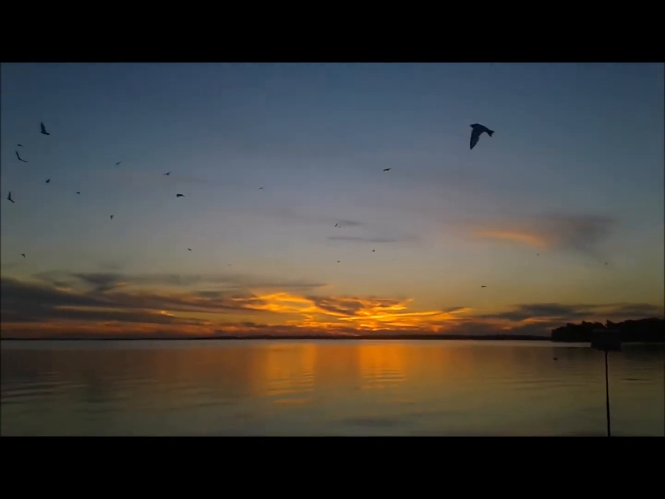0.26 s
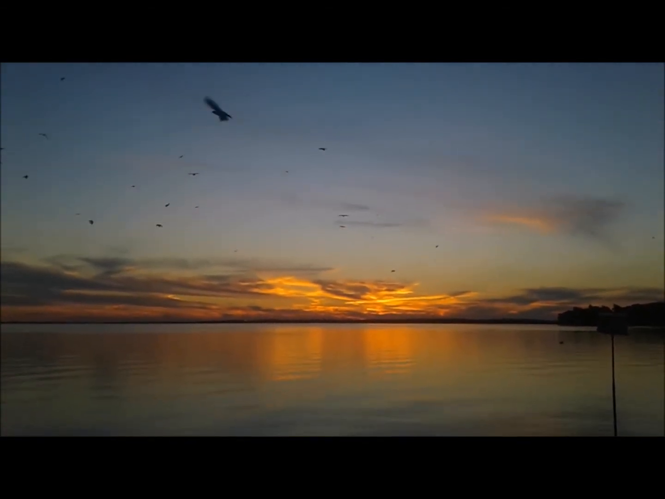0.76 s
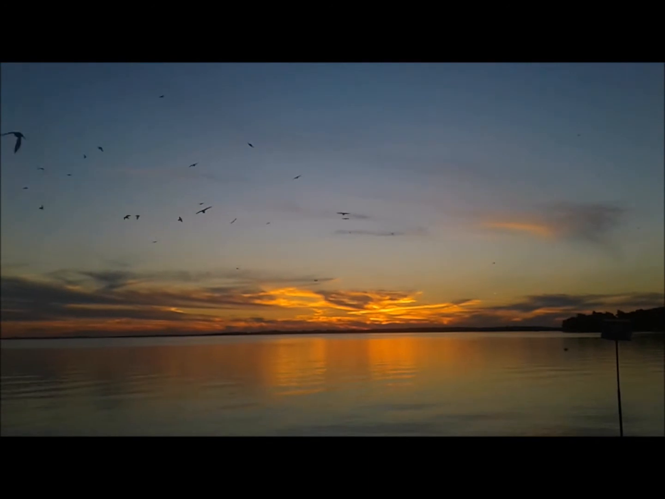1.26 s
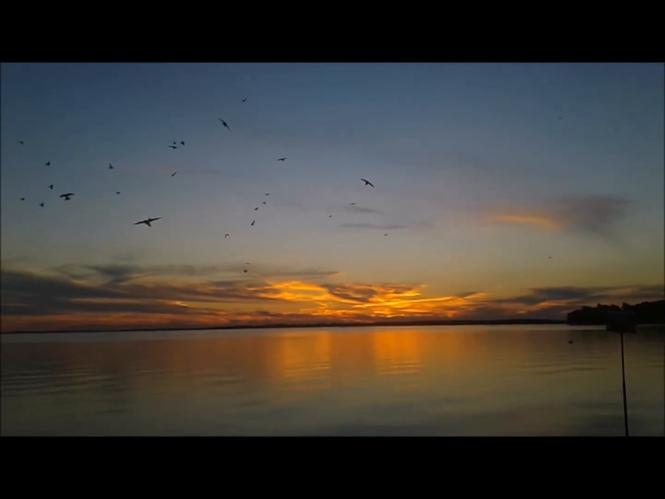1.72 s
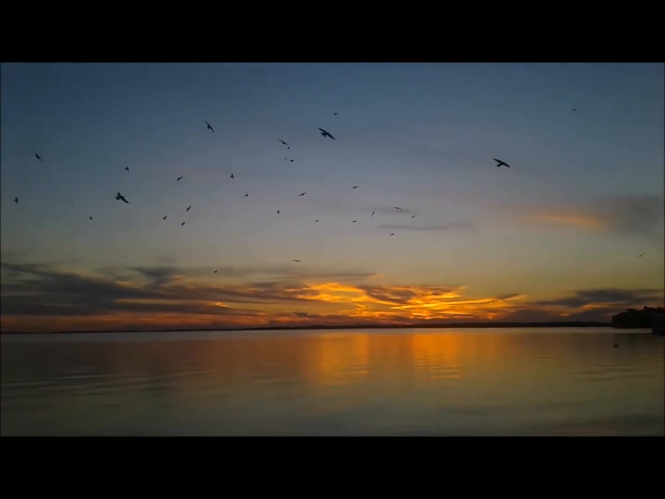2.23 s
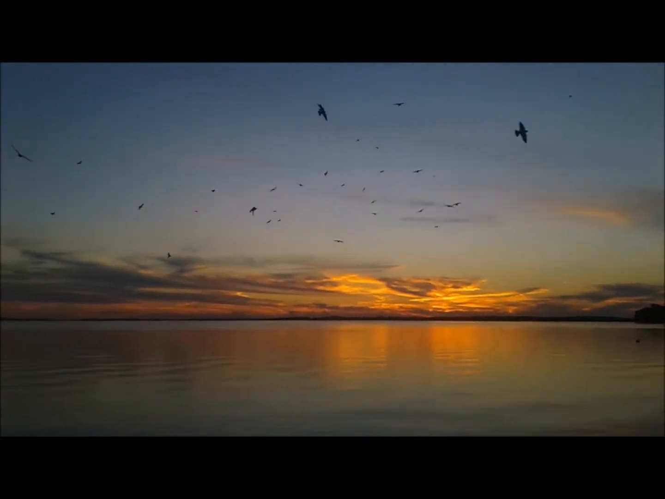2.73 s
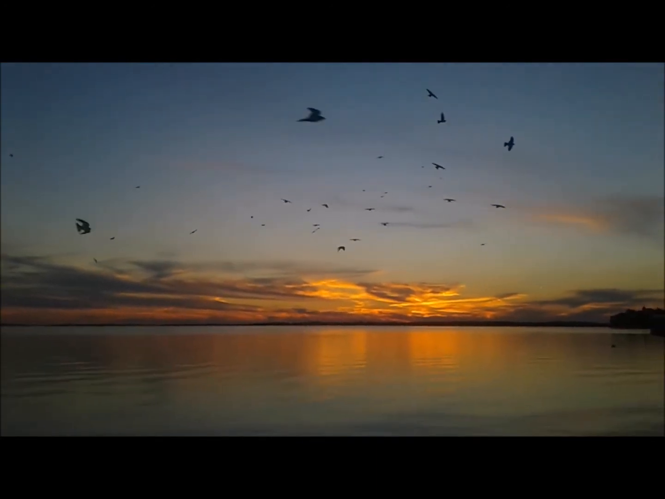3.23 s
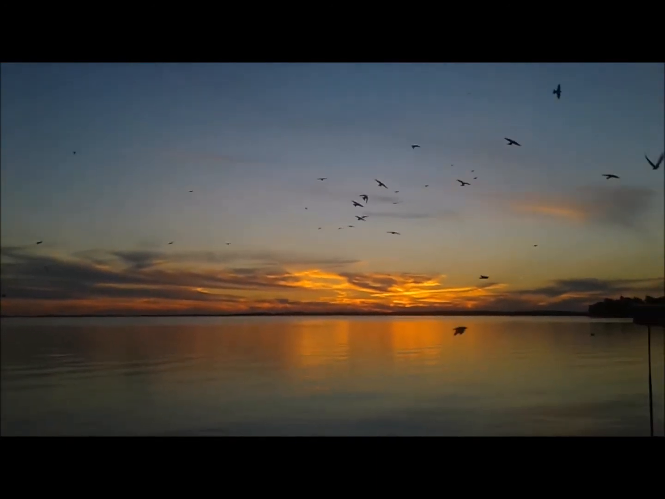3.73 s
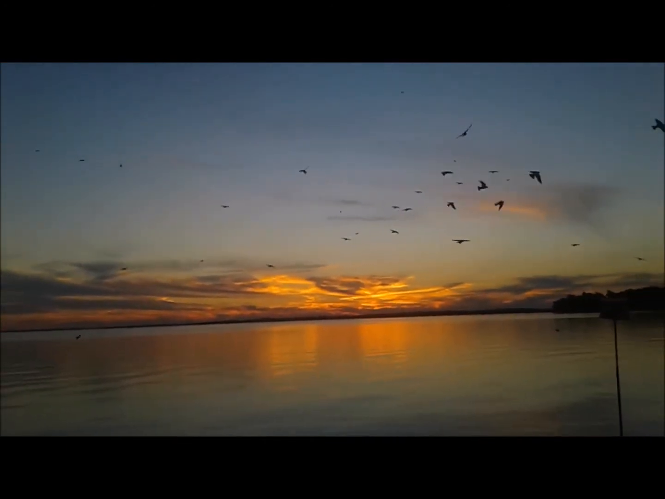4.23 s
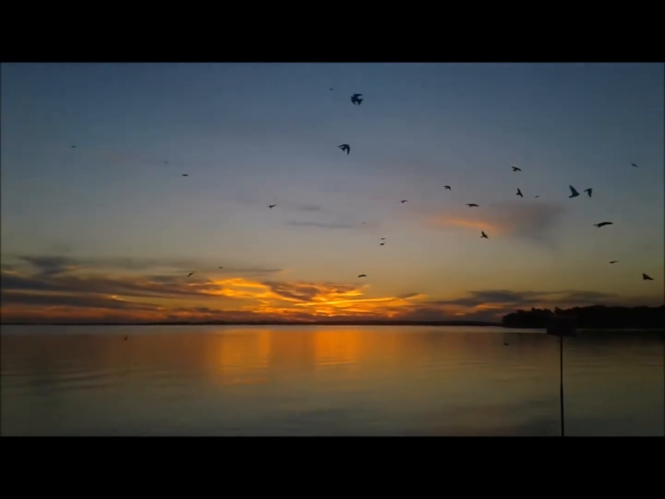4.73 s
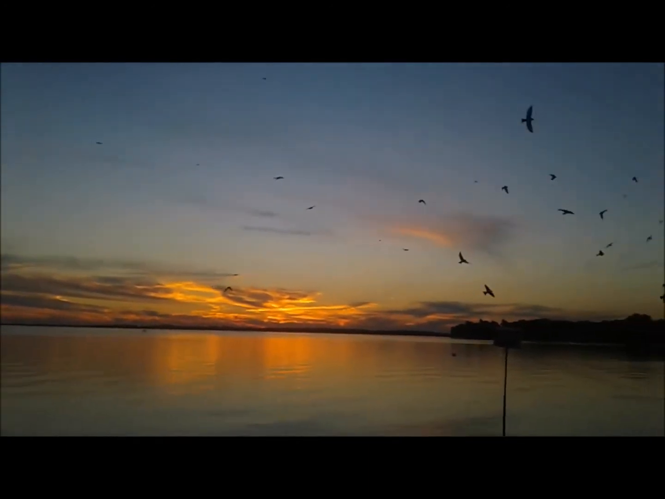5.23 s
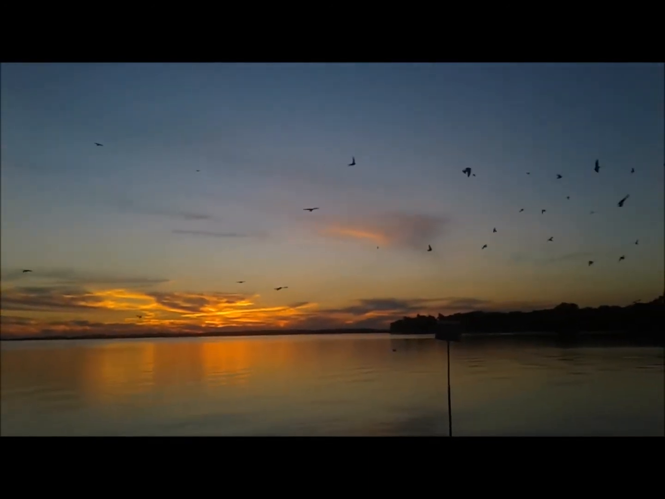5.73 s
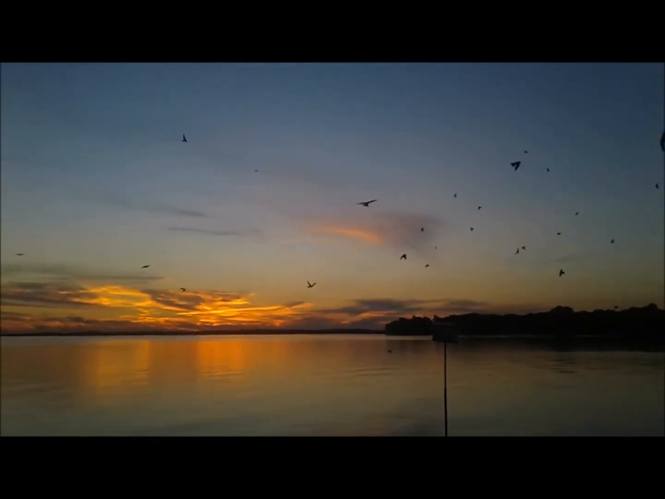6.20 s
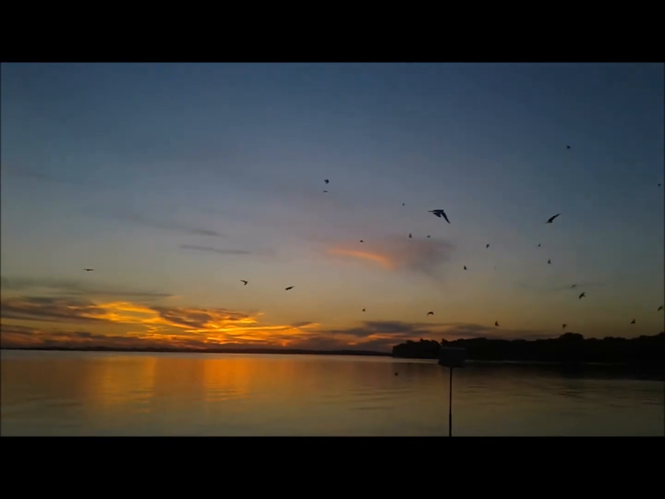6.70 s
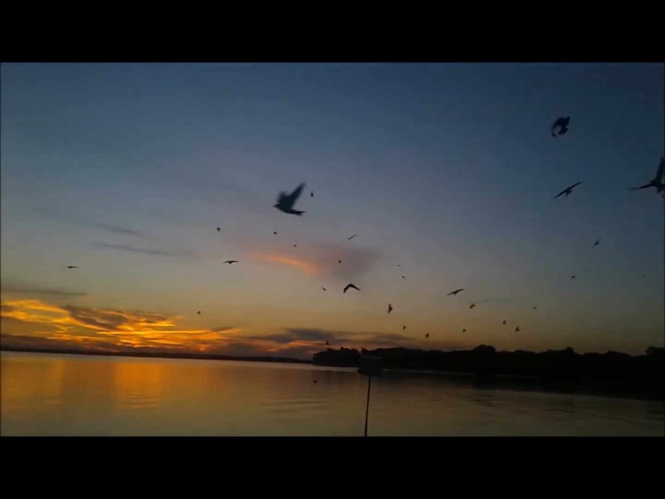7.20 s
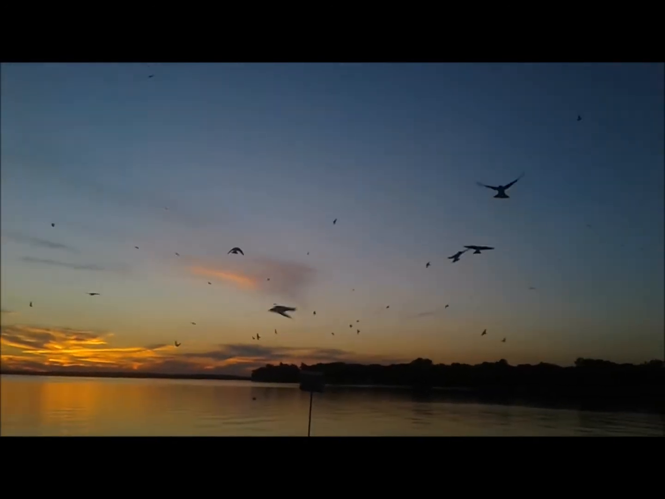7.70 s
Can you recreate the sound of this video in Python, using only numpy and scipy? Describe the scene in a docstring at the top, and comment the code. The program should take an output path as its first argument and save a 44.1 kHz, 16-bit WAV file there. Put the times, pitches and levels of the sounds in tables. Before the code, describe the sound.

A flock of martins circles over open water, giving short burry whistles that fall in pitch, mixed with brief held trills, nasal mews and dry rasps. Calls shift slightly between left and right, with a close water reflection and thin shore echo. Fainter birds chatter behind. A quiet low motor hum and soft air wash lie underneath. Toward the end the rasps grow louder and come regularly. Stereo outdoor microphone.

```python
"""A flock of martins wheels over open water: mostly falling whistles, each shaken by a very fast trill.
Short held notes, harsh rasps from a clapping syrinx, nasal mews and thin sliding slurs come between.
The water mirrors every call a few milliseconds later, and the shore adds a thin noise-tail echo.
Fainter birds chatter behind, over a far motor of wavering low tones and a soft noise wash of air and water."""
import sys
import numpy as np
from scipy import signal
from scipy.fft import rfft, irfft, next_fast_len
from scipy.io import wavfile

SR = 44100
rng = np.random.default_rng(int(sys.argv[2]) if len(sys.argv) > 2 else 0)


def transcribe(signal):
    """Save signal, clipped to [-1, 1], as a 16-bit WAV file at the path in sys.argv[1]."""
    frames = np.atleast_2d(signal).T
    limited = np.clip(frames, -1, 1)
    pcm = np.round(limited * 32767).astype(np.int16)
    wavfile.write(sys.argv[1], SR, pcm)


N = 350595
TIME = np.arange(N) / SR


def undb(db):
    """Decibels to gain."""
    return 10 ** (np.asarray(db) / 20)


def unit(x):
    """Scale to rms 1."""
    return x / np.sqrt(np.mean(x ** 2) + 1e-18)


def colour(points, hz):
    """Read (frequency, value) points along a log-frequency axis."""
    where, value = np.transpose(points)
    return np.interp(np.log(np.maximum(hz, 1e-3)), np.log(where), value)


def walk(t, rate):
    """A smooth random wander over the times t, spread near 1, with rate random knots per second."""
    knots = rng.standard_normal(int(t[-1] * rate) + 4)
    fine = signal.resample(knots, 8 * len(knots))
    return np.interp(t * rate * 8, np.arange(len(fine)), fine)


def resonate(x, hz, width_hz):
    """A resonance applied twice, gain 1 at its centre."""
    b, a = signal.iirpeak(hz, hz / width_hz, fs=SR)
    return signal.lfilter(b, a, signal.lfilter(b, a, x))


def fade(t, attack_s, release_s):
    """Rounded opening and closing of a call."""
    opening = np.sin(np.pi / 2 * np.clip(t / attack_s, 0, 1))
    closing = np.sin(np.pi / 2 * np.clip((t[-1] - t) / release_s, 0, 1))
    return opening * closing


def add(out, sound, start):
    """Mix a stereo sound in at a time."""
    i = int(start * SR)
    out[:, i:i + sound.shape[1]] += sound[:, :max(N - i, 0)]


# even wash of air and water: (frequency [Hz], relative spectral level [dB per Hz])
AIR_SPECTRUM = [(25, -26.5), (60, -3.5), (110, -2.5), (180, -2), (310, 3), (480, -4.5), (1000, -7.5),
                (1400, -13.5), (2200, -15), (5500, -23.5), (9000, -31.5), (15500, -32.5)]
# how alike the two ears are in that wash: (frequency [Hz], correlation [-1 to 1])
EAR_LIKENESS = [(30, 0.68), (100, 0.77), (330, 0.92), (700, 0.5), (1400, 0), (5000, 0)]


def air(level_db=-49.5):
    """Coloured noise as a soft wash, most alike in both ears in the bass, swelling slightly throughout."""
    hz = np.fft.rfftfreq(N, 1 / SR)
    gain, likeness = undb(colour(AIR_SPECTRUM, hz)), colour(EAR_LIKENESS, hz)

    def part(sign):
        share = np.sqrt(np.clip(1 + sign * likeness, .01, 2))
        return irfft(rfft(rng.standard_normal(N)) * gain * share, N)

    mid, side = part(1), part(-1)
    swell_db = np.interp(TIME, [0, TIME[-1]], [-.8, .8])
    return unit(np.array([mid + side, mid - side])) * undb(level_db + swell_db)


# tones of the far motor: (mean frequency [Hz], mean peak level [dB])
MOTOR_TONES = [(106, -61), (120, -71), (163, -65.5), (241, -54), (311, -57.5), (360, -61.5), (621, -69.5),
               (765, -66), (931, -66.5), (1084, -66.5)]


def motor(drift_hz=1.692, drift=0.00595, throb_db=2):
    """A far motor: a few low tones that waver on their way across the water, the higher ones more."""
    out = 0
    for hz, db in MOTOR_TONES:
        pitch = hz + (drift_hz + drift * hz * hz / 500) * walk(TIME, 16)
        out = out + undb(db + throb_db * walk(TIME, 9)) * np.sin(2 * np.pi * np.cumsum(pitch) / SR)
    return out


def shore(birds, centre_hz=2900, width_hz=4200, build_s=0.18, t60_s=0.4, level_db=-12.5):
    """A thin, patchy echo that builds slowly; the long path takes the top off."""
    t = np.arange(SR) / SR
    decay = undb(-60 * t / t60_s) * (1 - np.exp(-t / build_s))
    heard = []
    tails = []
    for _ in range(2):
        patchy = rng.standard_normal(SR) * decay * undb(2.2 * walk(t, 62.6))
        tails.append(resonate(patchy, centre_hz, width_hz))
    for ear, tail in zip(birds, tails):
        heard.append(signal.fftconvolve(ear, tail)[:N])
    # the echo is set relative to the birds
    return unit(np.array(heard)) * np.std(birds) * undb(level_db)


def from_sky(call, pan_db, lag_ms, mirror=0.28, detour_ms=7, scatter=0.58):
    """A call reaches the two ears directly, again off the water, and scattered by the ripples."""
    size = next_fast_len(len(call) + SR // 20)
    spin = -2j * np.pi * np.arange(size // 2 + 1) * SR / size / 1000  # phase per ms of delay
    ears = np.array([[.5], [-.5]])
    # the detour varies from half to double
    bounce = mirror * np.exp(spin * detour_ms * 2 ** rng.uniform(-1, 1))
    paths = (1 + bounce) * np.exp(spin * lag_ms * ears)
    ripples = np.exp(spin * rng.uniform(1, 24, (2, 4, 1))).sum(axis=1) / 2
    spread = np.sqrt(1 + mirror ** 2 + scatter ** 2)
    return irfft(rfft(call, size) * (paths + scatter * ripples), size) * undb(pan_db * ears) / spread


def trill(t, mean_hz=137.33):
    """Phase of the fast trill; each call has its own slightly unsteady rate."""
    rate = mean_hz * (1 + 0.0673 * rng.standard_normal() + 0.042 * walk(t, 42.3))
    return 2 * np.pi * (np.cumsum(rate) / SR + rng.random())


def far_birds(count=50, far_db=-53, spread_db=3):
    """The rest of the flock makes the same falling call at random, faint and dull."""
    out = np.zeros((2, N))
    starts = rng.uniform(0, N / SR, count)
    for start, (size, loud, side) in zip(starts, rng.standard_normal((count, 3))):
        pitches = np.array([3650, 3000, 2250]) * (1 + .05 * size)
        levels = far_db + spread_db * loud + np.array([0, 1, -3])
        add(out, from_sky(chirp(0.2, pitches, levels, -47, 0), side, 0.049 * side), start)
    return out


def slur(length, first_hz, last_hz, waver_hz=40, flutter_db=2):
    """A plain, slightly unsteady whistle that drops and levels out."""
    t = np.arange(int(length * SR)) / SR
    hz = last_hz + (first_hz - last_hz) * (1 - t / t[-1]) ** 2.5 + waver_hz * walk(t, 350)
    whistle = np.sin(2 * np.pi * np.cumsum(hz) / SR)
    return unit(whistle * fade(t, 0.015, 0.052) * undb(flutter_db * walk(t, 90)))


# thin downward whistles without a trill: (start [s], length [s], first pitch [Hz], level [dB])
SLUR_CALLS = [(1.441, .19, 2825, -55), (1.656, 0.051, 2920, -49), (3.618, .045, 2880, -39.5),
              (3.673, .048, 2550, -48), (3.829, 0.038, 2640, -46), (4.441, 0.044, 5460, -50),
              (5.254, 0.052, 5450, -47)]


def slurs(out, end_share=.74):
    """Thin slurs from straight ahead; each ends at a fixed share of its first pitch."""
    for start, length, first_hz, db in SLUR_CALLS:
        add(out, from_sky(undb(db) * slur(length, first_hz, end_share * first_hz), 0, 0), start)


def mew(length, top_hz, rise=0.2, sink=.2, depth_hz=150, waver_hz=110, dying_db=-20):
    """A nasal call: it arches up hoarsely, then sinks while the voice grows clean and faint."""
    t = np.arange(int(length * SR)) / SR
    u = t / t[-1]
    arch = 1 - rise * np.exp(-t / 0.017) - sink * (t / 0.19) ** 1.1
    hz = top_hz * arch + (1 - u ** 2) * (depth_hz * np.sin(trill(t)) + waver_hz * walk(t, 900))
    phase = 2 * np.pi * np.cumsum(hz) / SR
    harmonics_db = [6, 3, -13.5, -26.5]
    voice = sum(undb(db) * np.sin((k + 1) * phase) for k, db in enumerate(harmonics_db))
    return unit(voice * fade(t, 0.03, 0.018) * undb(dying_db * u + 3.6 * walk(t, 120)))


# nasal calls, strong in the first two harmonics:
# (start [s], end [s], pitch the arch reaches towards [Hz], level [dB], left minus right [dB])
MEW_CALLS = [(0.417, 0.621, 2830, -52, -3), (0.652, 0.709, 2486, -46.5, 10), (1.08, 1.187, 2420, -44, -6.5),
             (1.424, 1.618, 2640, -48, -2), (2.005, 2.1, 2625, -52, 0), (3.334, 3.559, 2497, -40.5, -7),
             (3.88, 4.077, 2652, -41, -1.5)]


def mews(out):
    """Nasal mews, panned by level alone."""
    for start, end, top_hz, db, pan_db in MEW_CALLS:
        add(out, from_sky(undb(db) * mew(end - start, top_hz), pan_db, 0), start)


# what throat and open beak pass of a rasp: (multiple of the throat resonance [ratio], relative level [dB])
THROAT_RESPONSE = [(.12, -39.5), (.27, -12), (.4, -4.5), (.5, -1.5), (.78, 5.5), (1, 10), (1.17, 1.5),
                   (1.43, -18.5), (1.7, -22), (2.05, -13.5), (2.6, -36.5), (3.2, -30.5), (3.8, -38)]


def rasp(length, throat_hz, db, uneven=.11, swell_db=6, judder=0.1, breath=0.65, brighten=0.85):
    """The syrinx claps irregularly, each clap with a puff of turbulence; both ring throat and open beak."""
    t = np.arange(int(length * SR)) / SR
    turns = np.cumsum(throat_hz / 5 * (1 + uneven * walk(t, 700))) / SR
    claps = unit(np.diff(np.floor(turns), prepend=0))
    puffs = unit((np.exp(-(turns % 1) / 0.25) + 0.1) * rng.standard_normal(len(t)))
    grain = undb(1.8 * walk(t, 300))
    source = (claps + 2 * breath * puffs) * (1 + judder * np.sin(trill(t))) * grain
    ratio = np.fft.rfftfreq(len(t), 1 / SR) / throat_hz
    # a louder bird is nearer, so more of its treble arrives
    tilt = brighten * (db + 30.0) * np.clip(ratio - 1.2, 0, 1)
    voice = irfft(rfft(source) * undb(colour(THROAT_RESPONSE, ratio) + tilt), len(t))
    swell = undb(swell_db * np.minimum(2 * t / t[-1], 1))  # over the first half
    return undb(db) * unit(voice * fade(t, 0.03, 0.076) * swell)


# harsh calls: (start [s], length [s], level [dB], throat resonance [Hz], left minus right [dB])
RASP_CALLS = [(.001, .13, -33, 4175, 10.5), (0.641, 0.1, -36.5, 4160, 0), (2.588, 0.16, -37.5, 3440, -0.5),
              (3.337, 0.31, -43, 3830, 4), (4.518, .085, -39, 3240, -2), (4.938, 0.14, -33.5, 4138, -.5),
              (5.282, 0.15, -31.5, 4134, -1), (5.775, 0.13, -30.5, 4123, 0),
              (6.203, .144, -29.5, 4083, -1.5), (6.558, .133, -31.5, 4215, -2.5),
              (6.962, 0.14, -29.5, 4237, -4), (7.288, 0.13, -26.5, 4190, -2.5),
              (7.641, 0.15, -25, 4240, -1.5)]


def rasps(out, lag_ms=-.16):
    """Harsh rasps, all slightly early in the left ear."""
    for start, length, db, throat_hz, pan_db in RASP_CALLS:
        add(out, from_sky(rasp(length, throat_hz, db), pan_db, lag_ms), start)


# what the beak passes of the side tones of a whistle: (frequency [Hz], level [dB])
BEAK_RESPONSE = [(1300, -18.5), (1750, 7), (2200, -2.5), (4300, 3.5), (4950, -4), (5800, -7.5), (6600, -8),
                 (7500, 1.5), (9000, 0.5), (12000, -6.5)]


def chirp(length, pitches, levels, overtone_db, doubling, waver_hz=45, hoarse=0.033, third_db=-15,
          scoop_hz=450, bend_hz=60, trill_depth_hz=195):
    """A whistle whose fast trill shakes pitch and strength; the syrinx may start in period doubling."""
    t = np.arange(int(length * SR)) / SR
    u, beat = t / t[-1], trill(t)
    # the note scoops up, holds, falls and levels out
    line = np.polyval(np.polyfit([0, .5, 1], pitches, 2), u)
    glide = line - scoop_hz * np.exp(-t / 0.00728) + bend_hz * np.sin(2 * np.pi * u)
    # the trill depth varies from call to call and widens along the note
    depth_hz = trill_depth_hz * undb(2.55 * rng.standard_normal()) * (0.78 + .5 * u)
    waver = waver_hz * (walk(t, 599.5) + 0.612 * walk(t, 50))
    phase = 2 * np.pi * np.cumsum(glide + depth_hz * np.sin(beat) + waver) / SR

    def side_tone(k):
        return undb(colour(BEAK_RESPONSE, k * glide)) * np.sin(k * phase)

    overtones = undb(overtone_db) * (side_tone(2) + undb(third_db) * side_tone(3))
    # period doubling adds tones at half and one and a half times the pitch, dying towards the tail
    doubled = doubling * np.cos(np.pi / 2 * u) ** 3 * (side_tone(.5) + side_tone(1.5))
    voice = np.sin(phase) + overtones + doubled
    strength = undb(np.interp(u, [1 / 6, 1 / 2, 5 / 6], levels))
    throb = 1 + .33 * np.sin(beat + 1)
    roughness = 1 + hoarse * walk(t, 1800)
    return np.sqrt(2) * strength * throb * roughness * fade(t, 0.023, 0.024) * voice


def note(length, hz, db, swell_db, doubling, fall_per_s, lowest_hz=2163, arch_db=3):
    """A trilled note: its pitch line sinks steadily while the level arches and swells or fades."""
    place = np.array([-1, 0, 1])  # head, middle, tail
    # fall as a share of the middle pitch per second; at the bottom of the range a call falls less far
    half_fall_hz = min(hz * fall_per_s * length / 2, hz - lowest_hz)
    levels = db + swell_db * place / 2 - arch_db * place ** 2
    overtone_db = -27.5 - 0.18 * (db + 30)  # stronger notes are purer
    return chirp(length, hz - half_fall_hz * place, levels, overtone_db, doubling)


# short trilled notes that nearly hold their pitch: (start [s], length [s], pitch at the middle [Hz],
# level [dB], swell from head to tail [dB], left minus right [dB], left ear lag [ms])
PIP_CALLS = [(0.465, .13, 3390, -31, 2.5, 9, -.16), (.684, .119, 3583, -32, 11.5, 4.5, -0.032),
             (1.861, .108, 3830, -40.5, -6, 2.5, -.21), (1.951, .112, 3544, -32, 2, 1, -0.12),
             (2.894, .1, 3556, -38, 3, 0.5, -0.095), (3.26, 0.1, 3444, -27.5, 3, 1.5, 0.33),
             (3.405, .125, 3140, -24.5, -7.5, 1, -0.072), (3.545, .1, 3442, -27.5, 3.5, 3.5, .26),
             (3.7, .088, 3857, -30, -2.5, 0.5, -.12), (3.944, .079, 3550, -27.5, 3, -2.5, -.16),
             (4.465, .125, 3380, -28.5, -4.5, 6, .16), (4.59, 0.13, 3330, -30, 6.5, 1, 0.073),
             (5.067, .1, 3454, -35, 1.5, 3.5, .18), (5.215, .082, 3450, -29, 1, 1, -.18),
             (5.328, .099, 3523, -21, 5, 0.5, -.02), (5.442, .085, 3870, -34.5, -6, 5, -.05),
             (5.75, .119, 2870, -37.5, 3.5, -0.5, 0.077), (5.84, .065, 4000, -33, 2.5, 1, 0),
             (6.331, 0.1, 3375, -36.5, -4.5, 5, -.08), (7.153, .116, 3520, -26.5, 13, 4.5, -0.088),
             (7.627, .125, 3400, -22.5, 2, 3, 0.0071), (7.86, .108, 3270, -33.5, 7.5, 2, .09)]


def pips(out, doubling=0.015, fall_per_s=0.94):
    """Short trilled notes with a gentle fall and a trace of period doubling."""
    for start, length, hz, db, swell_db, pan_db, lag_ms in PIP_CALLS:
        call = note(length, hz, db, swell_db, doubling, fall_per_s)
        add(out, from_sky(call, pan_db, lag_ms), start)


# falling trilled calls: (start [s], length [s], pitch at the middle [Hz], level [dB],
# swell from head to tail [dB], period doubling [0-1], left minus right [dB], left ear lag [ms])
CHIRP_CALLS = [(0.102, 0.16, 2840, -32.5, -3, .12, -1.5, 0.078),
               (0.207, 0.15, 3060, -37.5, -2.5, 0.14, -2.5, 0.025),
               (0.411, .165, 2733, -35.5, -1, 0.07, -6.5, -0.092),
               (0.612, .183, 3174, -22.5, 4.5, 0.2, 3.5, -0.29),
               (0.836, .121, 2856, -33, -2.5, 0.06, 3, 0.26), (0.975, 0.13, 2764, -34.5, 2, 0, 7.5, 0.27),
               (1.052, 0.15, 3262, -30.5, 3.5, 0.04, 2.5, 0.037),
               (1.206, .18, 2980, -27, 3, 0.06, 6.5, 0.25), (1.638, 0.17, 3040, -25.5, -5, 0, 1.5, -0.024),
               (1.737, 0.14, 3130, -39, -9, 0, 6, 0.079), (2.027, .158, 2920, -29.5, -7.5, 0.11, 0, .26),
               (2.384, .137, 3274, -25, 2, 0, 1, 0.024), (2.452, 0.19, 2914, -24.5, -5, 0, -0.5, -0.13),
               (2.521, 0.13, 3470, -33.5, 10, 0, 6, 0.12), (2.611, 0.17, 2844, -27, -3, 0.03, -1, 0.099),
               (2.772, .169, 3084, -30.5, 5, 0.15, -1, .09), (2.945, .128, 3028, -29, 4.5, 0, 1.5, 0),
               (3.31, .141, 2927, -24, -6.5, 0.05, 1.5, -0.02),
               (3.784, .193, 2700, -29.5, -9.5, 0.01, 2.5, -.08),
               (3.998, 0.16, 2915, -24.5, -4.5, 0.01, -2, -0.13),
               (4.169, 0.15, 2990, -32.5, -2, 0, -2, -0.17), (4.37, 0.13, 2980, -28, 2.5, 0.01, -2.5, 0),
               (4.661, 0.12, 3320, -28, 6.5, 0, 2.5, -0.12), (4.68, 0.091, 2700, -29, 5, 0.12, -6, 0.15),
               (5.147, 0.15, 2795, -29, -5, .03, -4, -0.17),
               (5.415, .138, 2661, -26, -12.5, .03, -1, 0.063),
               (5.863, 0.14, 2980, -32, -9, 0.05, -1, -0.17), (5.991, 0.16, 3090, -36, 0, .02, -3.5, -0.18),
               (5.999, 0.12, 3710, -28.5, -0.5, 0.03, .5, 0.16),
               (6.138, .127, 2796, -33, 1.5, 0.1, -3, -0.24), (6.239, 0.15, 3008, -22, -8, 0, -1.5, -0.34),
               (6.416, 0.15, 3094, -41, 0.5, 0.06, 1, -0.19),
               (6.631, 0.11, 2960, -26, -4.5, 0.05, 1, -0.07),
               (6.695, .106, 3780, -33.5, 3.5, .08, 2, -0.19), (6.797, .18, 2735, -28, -4, 0.02, -1.5, 0),
               (6.985, .15, 3077, -21, -4, 0.05, 0.5, .11),
               (7.379, .151, 2900, -23.5, -1.5, 0.03, -3.5, -.27),
               (7.76, .155, 2836, -22.5, -3.5, .03, -5.5, -0.22)]


def chirps(out, fall_per_s=3.0):
    """The main calls: trilled whistles that fall steeply, each from its own direction."""
    for start, length, hz, db, swell_db, doubling, pan_db, lag_ms in CHIRP_CALLS:
        call = note(length, hz, db, swell_db, doubling, fall_per_s)
        add(out, from_sky(call, pan_db, lag_ms), start)


def near_birds():
    """Every call of the birds overhead."""
    out = np.zeros((2, N))
    for layer in (slurs, mews, rasps, pips, chirps):
        layer(out)
    return out


def scene():
    """Birds, their echo and the quiet background."""
    birds = near_birds() + far_birds()
    return birds + shore(birds) + motor() + air()


def record(dry, top_hz=15700):
    """The recorder cuts the top with a steep low-pass."""
    return signal.sosfiltfilt(signal.ellip(10, .05, 60, top_hz, fs=SR, output="sos"), dry)


dry = scene()
out = record(dry)
transcribe(out)
```